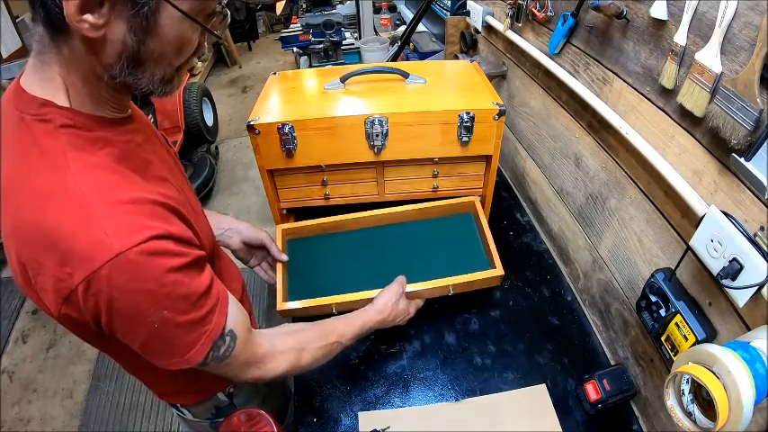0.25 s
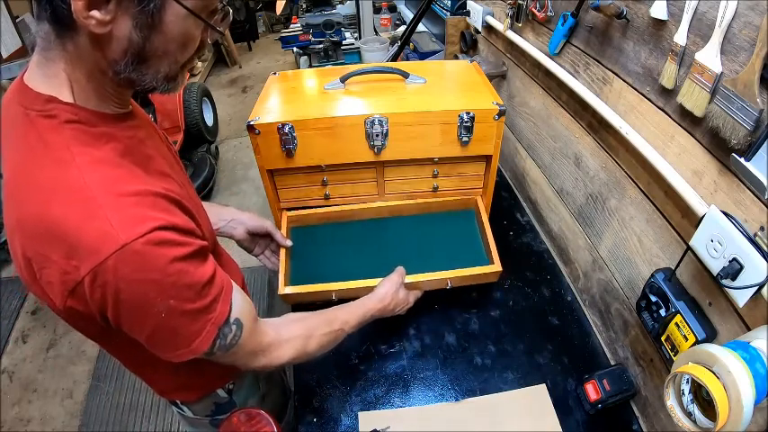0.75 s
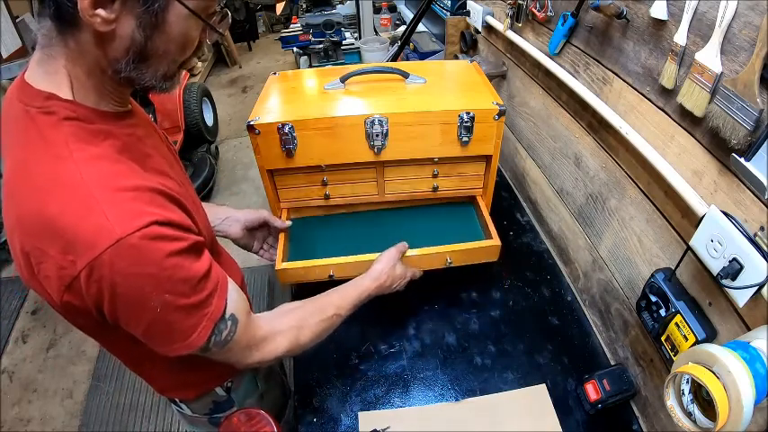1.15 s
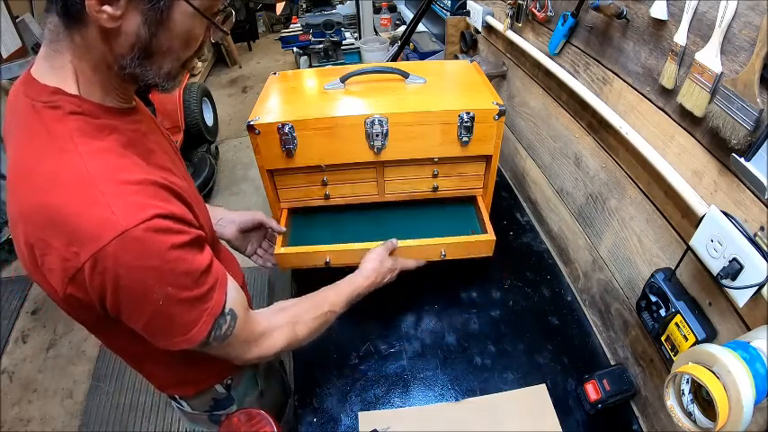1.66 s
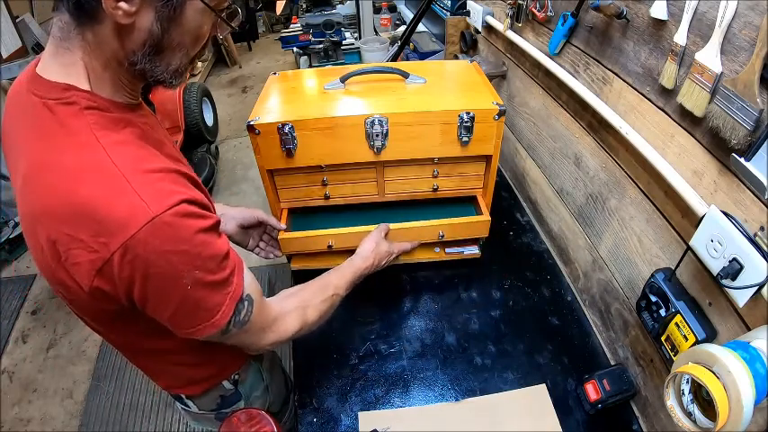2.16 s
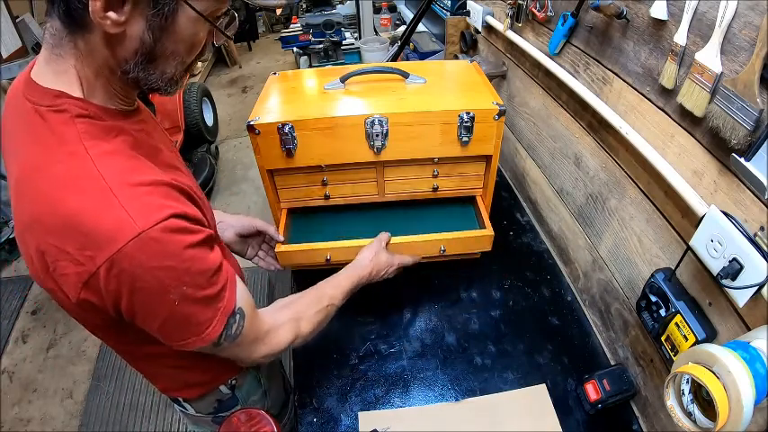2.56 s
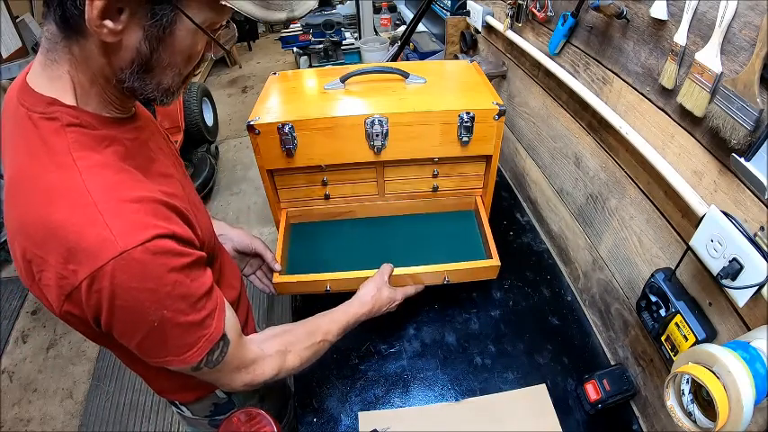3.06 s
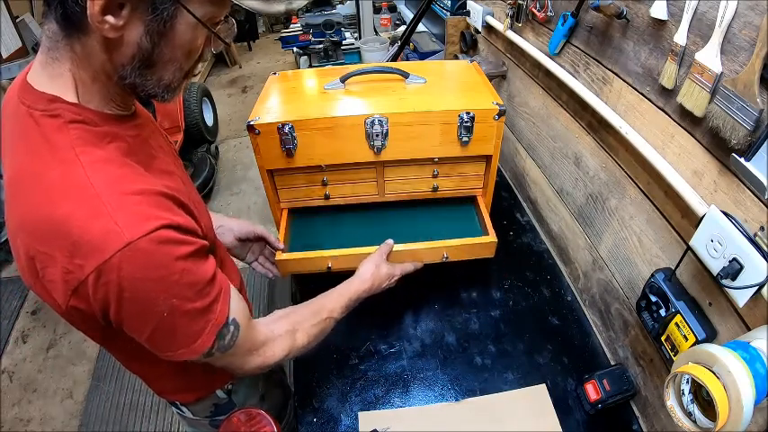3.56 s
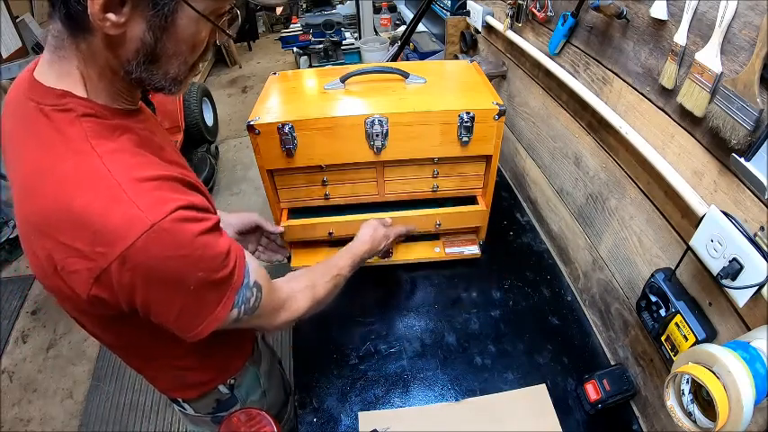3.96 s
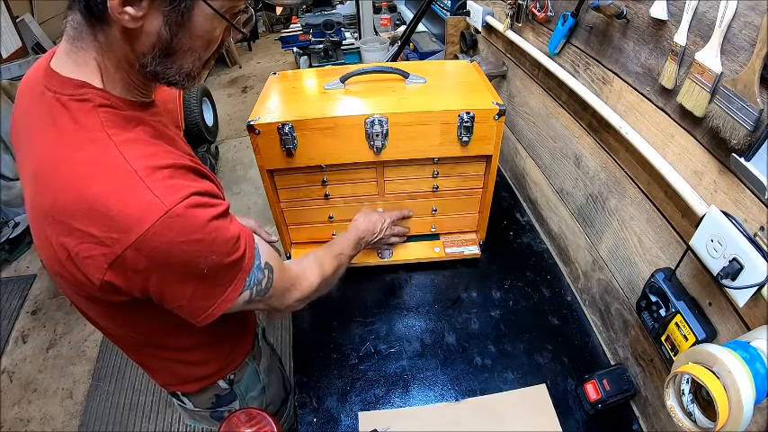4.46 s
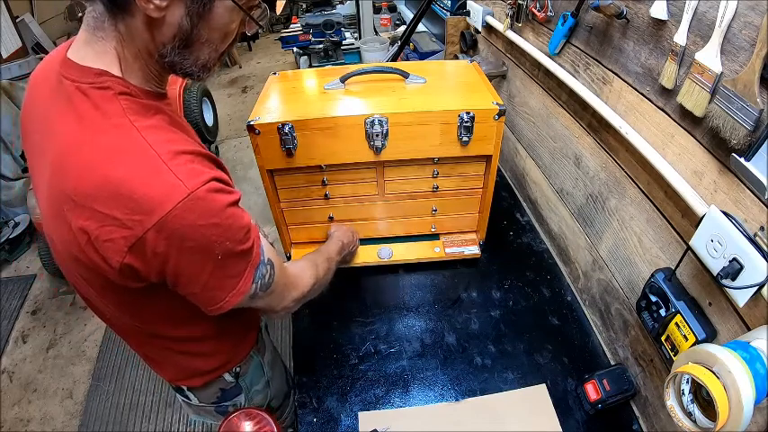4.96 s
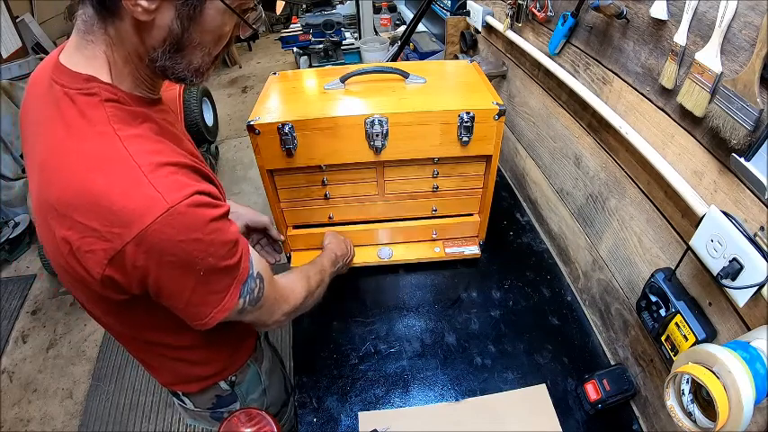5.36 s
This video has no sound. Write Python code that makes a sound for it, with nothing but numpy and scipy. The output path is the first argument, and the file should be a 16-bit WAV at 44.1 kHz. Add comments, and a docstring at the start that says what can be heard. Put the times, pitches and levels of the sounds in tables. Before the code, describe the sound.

Wood rubs on wood in short hissing strokes with dull knocks, a juddering squeak and a hard closing bump in a small workshop.

```python
"""A wooden drawer is fitted into a tool chest, slid in and out, and bumped shut; then the next one is pulled.
Each knock is a tick, a clack, a boom of the thin drawer bottom and a ring of the case, made of fading tones
and coloured noise. The sliding is noise that hisses, scrapes and drones with the speed of the hand;
where the drawer binds, a train of tiny slips makes it judder. A small workshop with a faint hum answers."""
import sys
import numpy as np
from scipy import signal
from scipy.fft import rfft, irfft
from scipy.io import wavfile

SR = 44100
rng = np.random.default_rng(int(sys.argv[2]) if len(sys.argv) > 2 else 0)


def output_pcm(signal):
    """Save a mono or channel-first signal as 16-bit PCM at the path in sys.argv[1].

    Samples are clipped to [-1, 1] before scaling.
    """
    pcm = np.clip(np.atleast_2d(signal).T, -1, 1) * 32767
    wavfile.write(sys.argv[1], SR, np.round(pcm).astype(np.int16))


N = 246675
TIME = np.arange(N) / SR  # seconds


def gain_of(db):
    """Turns decibels into amplitude."""
    return 10 ** (np.asarray(db) / 20)


def evened(x):
    """Scales a signal to an rms of 1."""
    return x / np.sqrt(np.mean(x ** 2) + 1e-20)


def read(points, hz):
    """Reads values between the points of a table, over log frequency."""
    f, value = np.transpose(points)
    return np.interp(np.log(hz + 1), np.log(f + 1), value)


def add(mix, s, sound):
    """Adds a sound into the mix from second s on, cut off at the end of the mix."""
    part = mix[..., round(s * SR):][..., :sound.shape[-1]]
    part += sound[..., :part.shape[-1]]


def wander(corner_hz, size=N):
    """Smooth random motion of rms 1; its parts faster than the corner are weak."""
    hz = np.fft.rfftfreq(size, 1 / SR)
    spectrum = rfft(rng.standard_normal(size))
    return evened(irfft(spectrum / (1 + (hz / corner_hz) ** 4), size))


def swell(t, rise):
    """Envelope that reaches 1 after the rise time and dies away."""
    return t / rise * np.exp(1 - t / rise)


def colour(pair, spectrum, peaks=()):
    """Shapes two unrelated signals into one stereo sound of rms 1, partly alike on both sides."""
    # How alike left and right are. Each row: frequency in Hz, likeness (1 is identical).
    likeness = [(30, .1), (70, 0.63), (130, 0.91), (250, 1), (600, 0.68), (1400, 0.29), (3100, 0.83),
                (6500, 0.26), (14000, 0.05)]
    z, hz = rfft(pair), np.fft.rfftfreq(pair.shape[1], 1 / SR)
    same = np.clip(read(likeness, hz), -1, 1)
    right = same * z[0] + np.sqrt(1 - same ** 2) * z[1]
    z = np.array([z[0], right])
    db = read(spectrum, hz)
    for f, width, lift in peaks:
        db = db + lift / (1 + (2 * (hz - f) / width) ** 2)
    return evened(irfft(z * gain_of(db), pair.shape[1]))


def workshop(hum_db=-2, waver=.5):
    """Still air as soft coloured noise, and a faint hum of steady tones whose phases waver (radians)."""
    # Spectrum of the air. Each row: frequency in Hz, relative level in dB per Hz.
    air_spectrum = [(15, -44), (25, 2), (93, -7), (196, 0.5), (515, -13), (709, -6.5), (978, -8.5),
                    (1150, -12), (2070, -20), (3440, -19), (6540, -25), (9020, -27), (15000, -41)]
    # Tones of the hum. Each row: frequency in Hz, level in dB before hum_db is added.
    hum_tones = [(183.0, -87), (721.4, -83.5), (958.2, -87), (1518, -95), (8950, -103)]
    air = gain_of(-73) * colour(rng.standard_normal((2, N)), air_spectrum)
    hum = np.zeros(N)
    for f, db in hum_tones:
        tone = np.sqrt(2) * np.sin(2 * np.pi * f * TIME + waver * wander(4))
        hum += gain_of(db + hum_db) * tone
    return air + hum


def room(x, wet_db=-7, first=.006, bass_db=-3):
    """Bench and walls: sparse reflections from `first` seconds on, each band dying at its own speed."""
    # How long the room rings. Each row: frequency in Hz, time to fall by 60 dB in seconds.
    ring_times = [(100, 0.37), (220, 0.29), (500, 0.24), (1500, 0.28), (4000, 0.26), (12000, 0.2)]
    kept = (rng.random((2, SR)) < .1) * (TIME[:SR] > first)
    taps = rng.standard_normal((2, SR)) * kept
    taps = colour(taps, [(200, bass_db), (800, 0.67), (3000, 0.92), (10000, 0.11)])
    hz, t, z = signal.stft(taps, SR, nperseg=256)
    fade = gain_of(-60 * t / read(ring_times, hz)[:, None])
    tail = signal.istft(z * fade, SR, nperseg=256)[1]
    tail = tail / np.linalg.norm(tail[0])
    return x + gain_of(wet_db) * signal.fftconvolve(x, tail, axes=1)[:, :N]


def fingers(level_db=3, rise=0.024):
    """Fingers feel along the varnished front for the next knob: one short rub of skin for each touch."""
    # Touches. Each row: start in seconds, level in dB before level_db is added.
    touches = [(4.847, -49.5), (4.972, -58), (5.131, -60.5), (5.283, -58)]
    # Sound of the skin. Each row: frequency in Hz, relative level in dB per Hz.
    skin_spectrum = [(100, -19), (210, 17.5), (330, 10.5), (500, -8), (750, 1), (1200, -6), (1500, -20.5),
                     (4000, -34)]
    touch = np.zeros(N)
    for s, db in touches:
        add(touch, s, gain_of(db + level_db) * swell(TIME[:SR // 3], rise))
    return touch * colour(rng.standard_normal((2, N)), skin_spectrum)


def singing(level_db=-2):
    """Friction feeds one resonance of a panel, which swells, glides and fades."""
    # Each row: start in seconds, length in seconds, first pitch in Hz, last pitch in Hz,
    # level in dB before level_db is added.
    glides = [(1.68, 0.24, 1533, 1460, -48.5), (2.279, 0.06, 1105, 1117, -53.5),
              (2.575, .07, 4190, 4000, -52), (2.618, 0.14, 781, 929, -43.5), (2.678, .15, 350, 324, -49.5),
              (2.52, 0.54, 1498, 1518, -56), (2.693, 0.195, 2727, 2640, -53),
              (3.501, 0.17, 2380, 2640, -50), (3.596, 0.073, 2115, 2080, -39)]
    out = np.zeros(N)
    for s, length, first_hz, last_hz, db in glides:
        u = np.minimum(TIME[:SR] / length, 1)  # progress from 0 to 1
        spread_hz = 12 + .033 * first_hz  # how far the unsteady tone blurs around its pitch
        turn = np.exp(2j * np.pi * np.cumsum(first_hz + (last_hz - first_hz) * u) / SR)
        unsteady = wander(spread_hz, size=SR) + 1j * wander(spread_hz, size=SR)
        tone = evened((turn * unsteady).real)
        add(out, s, gain_of(db + level_db) * np.sin(np.pi * u) * tone)
    return out


def squawks(rows, rough):
    """A board, let go or jolted, sings for a few cycles; `rough` is how far its pitch strays (share)."""
    t, out = np.arange(SR // 5) / SR, np.zeros(N)
    for s, db, hz, rise in rows:
        turns = np.cumsum(hz * (1 + rough * wander(400, size=len(t)))) / SR
        add(out, s, gain_of(db) * swell(t, rise) ** 2 * np.sin(2 * np.pi * turns))
    return out


def clicks(rise=.0018):
    """A hard edge meets a runner or the back stop with a short bright crack of noise."""
    # Each row: start in seconds, level in dB.
    cracks = [(0.458, -64), (0.873, -56.5), (1.612, -54), (4.43, -29)]
    # Sound of the edge. Each row: frequency in Hz, relative level in dB per Hz.
    edge_spectrum = [(300, -3), (1000, 7), (2700, 10.5), (4000, -1), (7700, -1), (10000, -6.5),
                     (15000, -30.5)]
    t, out = np.arange(SR // 10) / SR, np.zeros((2, N))
    for s, db in cracks:
        crack = colour(rng.standard_normal((2, len(t))), edge_spectrum)
        add(out, s, gain_of(db) * swell(t, rise) * crack)
    return out


def binds(grab_s=0.02, ease_db_per_s=9, let_go_s=0.019):
    """How hard the drawer sticks over time: each bind grabs quickly, eases a little and lets go."""
    # Each row: start in seconds, length until it lets go in seconds, strength in dB.
    sticking = [(0.559, 0.092, -57.5), (1.135, .07, -44.5), (1.236, 0.018, -49), (1.615, .04, -52),
                (1.793, 0.031, -49), (1.935, 0.022, -50.5), (2.488, 0.028, -47.5), (3.604, 0.14, -36.5),
                (3.653, 0.057, -36.5), (3.749, 0.053, -39), (3.839, 0.029, -41), (3.997, .05, -40),
                (4.172, 0.058, -48), (4.306, 0.019, -48), (5.528, .02, -50)]
    t, power = np.arange(SR // 2) / SR, np.zeros(N)
    for s, length, db in sticking:
        shape = np.minimum(t / grab_s, 1) * np.exp(-np.maximum(t - length, 0) / let_go_s)
        add(power, s, (shape * gain_of(db - ease_db_per_s * t)) ** 2)
    return np.sqrt(power)


def judder(level_db=1, slips_per_s=350, jitter=.22, size_db=4, soft_hz=4500):
    """Stick and slip: an uneven train of tiny releases rings the drawer's sides."""
    # Resonances of the sides. Each row: frequency in Hz, width in Hz, relative level in dB.
    side_modes = [(1015, 70, 0), (1069, 70, 3.5), (1366, 70, -4.5), (1702, 30, 1), (1583, 110, -8.5),
                  (2115, 100, -4), (2350, 40, -13), (2650, 100, -15), (2950, 130, -15)]
    turns = np.cumsum(slips_per_s * np.exp(jitter * wander(204.1))) / SR
    slips = np.diff(np.floor(turns), prepend=0)  # one pulse at each whole turn
    slips = slips * gain_of(size_db * wander(99))
    slips = signal.lfilter(*signal.butter(2, soft_hz, fs=SR), slips)  # wood yields, so no release is sudden
    t = np.arange(SR // 10) / SR
    ring = np.zeros(len(t))
    for f, width, db in side_modes:
        ring += gain_of(db) * width * np.exp(-np.pi * width * t) * np.cos(2 * np.pi * f * t)
    return gain_of(level_db) * evened(signal.oaconvolve(slips, ring)[:N]) * binds()


def speed(start, rise, steady, fall, start_curve=0.94, stop_curve=2.65):
    """One stroke, 0-1: the hand starts briskly, keeps its pace and eases out to rest."""
    up = np.clip((TIME - start) / rise, 0, 1)
    down = np.clip((TIME - start - rise - steady) / fall, 0, 1)
    return np.sin(np.pi / 2 * up) ** start_curve * np.sin(np.pi / 2 * (1 - down)) ** stop_curve


def strokes():
    """Strength of hiss, scrape and drone over time: all follow the speed of the stroke under way."""
    # Strokes of the hand. Each row: start, speeding up, steady and slowing down, all in seconds,
    # then hiss, scrape and drone of the drawer bottom, in dB before the trims in sliding().
    hand_moves = [(0.33, 0.044, .005, 0.034, -80, -69, -64), (0.531, 0.096, 0.011, .07, -83, -53.5, -55.5),
                  (0.66, 0.06, 0.039, 0.19, -82, -67, -60), (0.86, 0.019, 0.11, 0.16, -73, -68, -50),
                  (0.968, .21, 0.016, 0.19, -56.5, -48.5, -50.5),
                  (1.587, 0.21, 0.025, 0.33, -50.5, -45.5, -51.5),
                  (2.04, 0.093, 0.014, 0.086, -63.5, -60.5, -59),
                  (2.268, 0.075, .005, 0.072, -66, -59.5, -55), (2.439, 0.17, 0.052, 0.49, -51, -45.5, -54),
                  (3.371, 0.37, .17, 0.29, -51.5, -47, -52), (3.92, 0.15, 0.32, 0.067, -57, -51.5, -53.5),
                  (4.85, 0.029, 0.033, 0.32, -66.5, -67.5, -66.5), (5.287, .24, .1, .2, -54, -47, -56)]
    drive = np.zeros((3, N))
    for start, rise, steady, fall, *levels_db in hand_moves:
        stroke = np.outer(gain_of(levels_db), speed(start, rise, steady, fall))
        drive = np.maximum(drive, stroke)
    return drive


def overhang(x, depth_db, width_hz, hold):
    """Lets bands rise and sink at random, like the boards' resonances as the drawer's free length changes."""
    hz, t, z = signal.stft(x, SR, nperseg=1024)

    def blur(axis, reach):
        """Weights that smooth along one axis."""
        return np.exp(-((axis[:, None] - axis) / reach) ** 2)

    field = evened(blur(hz, width_hz) @ rng.standard_normal(z.shape[1:]) @ blur(t, hold))
    bass_guard = np.minimum(hz / 1000, 1)[:, None]  # less change below 1000 Hz
    return evened(signal.istft(z * gain_of(depth_db * field * bass_guard), SR, nperseg=1024)[1][:, :N])


def sliding(hiss_db=1, scrape_db=1, drone_db=1, grain_db=1.27, uneven_db=1.64, catch_db=1.26, bind_db=-42):
    """Countless fibres catch and let go: speed makes hiss and drone, pressure drives the drawer's resonances."""
    # Wood rubbing on wood. Each row of these three: frequency in Hz, relative level in dB per Hz.
    hiss_spectrum = [(1500, -14.5), (3200, -3), (4100, 2), (5400, -4.5), (6300, -4), (7800, -2.5),
                     (8500, -12), (9100, -8.5), (10000, -16.5), (10800, -16.5), (11600, -27.5),
                     (13400, -26.5), (15000, -39.5)]
    scrape_spectrum = [(110, -31.5), (270, -7.5), (340, -7.5), (540, -6), (900, -0.5), (1220, -5.5),
                       (1550, 0), (1850, -8), (2700, -3.5), (3400, -12), (6000, -51)]
    drone_spectrum = [(40, -30.5), (115, -21), (150, 5.5), (205, 8), (270, -1.5), (400, -16.5), (1000, -54)]
    # Resonances of the sliding drawer. Each row: frequency in Hz, width in Hz, lift in dB.
    drawer_peaks = [(328.8, 93, 12), (968, 250, 1.5), (1680, 29, -1), (2135, 160, 3.5), (2370, 71, 1)]
    grip = evened(gain_of(grain_db * wander(580) + uneven_db * wander(26)))
    hiss = colour(grip * rng.standard_normal((2, N)), hiss_spectrum)
    scrape = colour(grip * rng.standard_normal((2, N)), scrape_spectrum, drawer_peaks)
    drone = colour(grip * rng.standard_normal((2, N)), drone_spectrum)
    hiss = overhang(hiss, depth_db=2.7, width_hz=60, hold=.15)
    scrape = overhang(scrape, depth_db=2.8, width_hz=45, hold=.1)
    pace, weight, flex = strokes()
    pressure = np.hypot(weight, gain_of(-3) * binds())  # a bind's extra pressure also drives the scrape
    binding = np.minimum(pressure / gain_of(bind_db), 1)  # pressed hard, the wood catches in coarse jerks
    jerks = gain_of(catch_db * binding * wander(140))
    out = gain_of(hiss_db) * pace * hiss
    out += gain_of(scrape_db) * pressure * jerks * scrape
    return out + gain_of(drone_db) * flex * drone


def knocks(boom_db=0, case_db=-2.0, upper_db=-0.5, clack_db=-14, tick_db=-45, boom_rise=0.00724,
           case_rise=0.0047, clack_rise=0.0047, tick_rise=0.0017, place_db=1.5, soften=0.29):
    """Each knock: a tick at the contact, a clack of the boards, the boom of the bottom, the ring of the case."""
    # Knocks of drawer on case; the rows from 4.872 to 5.13 s are soft bumps of the fingers on the front. # Each
    # row: start in seconds, strength in dB, boom pitch in Hz, hardness in dB (0 is a usual blow, less is
    # duller).
    blows = [(0.189, -17.5, 213, 0.5), (0.498, -23, 183, -0.5), (0.53, -31, 145, -3),
             (0.725, -39.5, 173, 0), (0.872, -35, 190, 4), (0.884, -32, 170, 2.5), (1.335, -31, 201, -5.5),
             (1.367, -23, 190, -8), (1.437, -31.5, 188, -15.5), (1.612, -33, 236, -1), (1.63, -32, 198, -9),
             (1.735, -37, 180, 8), (1.97, -27.5, 282, 3), (2.003, -28.5, 186, 3), (2.114, -45, 218, -14),
             (2.283, -39, 172, -6), (2.351, -46, 218, 2), (3.755, -23.5, 201, 3), (4.001, -29, 140, 7),
             (4.014, -21.5, 145, 5), (4.044, -21.5, 141, 4.5), (4.089, -14.5, 211, 1.5),
             (4.248, -25, 160, 0), (4.276, -30.5, 147, 4), (4.412, -11.5, 218, 0.5),
             (4.43, -9.5, 195.5, -4), (4.477, -24.5, 176.5, -10.5), (4.872, -33.5, 211, -11),
             (4.983, -44.5, 211, -7), (5.03, -37, 209, -12), (5.13, -48, 213, -2), (5.346, -25.5, 166, -15)]
    # Tones of the case. Each row: frequency in Hz, relative level in dB, time to fall by 60 dB in seconds.
    case_modes = [(84, -26, 0.27), (125, -13, 0.15), (138.3, -11.5, 0.21), (170, -25, .14),
                  (197, -24.5, 0.1), (242, -10, 0.17), (337.4, -23.5, 0.3), (384.8, -26, 0.26),
                  (429.5, -21.5, 0.19), (470, -24.5, 0.26), (532.7, -25, 0.12), (604.7, -24.5, .18),
                  (796, -24, 0.12), (1060, -27, 0.09), (1705, -37.5, 0.14), (1886, -40, 0.19),
                  (2643, -44.5, .16)]
    # Crowded upper modes of the boards, then the hard contact itself.
    # Each row: frequency in Hz, relative level in dB per Hz.
    clack_spectrum = [(70, -11.5), (130, -5.5), (210, -7.5), (330, 8.5), (500, 2.5), (750, 0), (1070, -5),
                      (1400, -9.5), (2700, -20.5), (4000, -25), (9000, -51)]
    tick_spectrum = [(1000, -30), (3000, -7), (5000, 11.5), (7700, 14.5), (10000, -2), (15000, -14.5)]
    t, out = np.arange(SR // 3) / SR, np.zeros((2, N))
    mode_hz, mode_db, t60 = np.transpose(case_modes)[:, :, None]
    upper = np.clip(np.log2(mode_hz / 240), 0, 1)  # 0 for low modes, 1 for those that need a hard blow
    for s, blow_db, hz, hard_db in blows:
        boards_db = blow_db + hard_db
        contact = gain_of(-soften * hard_db)  # a duller blow has a longer contact
        grain = rng.standard_normal((2, 2, len(t)))
        share, turn = 2 * rng.random((2, len(case_modes), 1)) - 1  # set by where the blow lands
        drive_db = (1 - upper) * (blow_db + case_db) + upper * (boards_db + upper_db) + place_db * share
        phase = 2 * np.pi * (mode_hz * (t - boom_rise) + upper * turn)  # the low modes swing with the bottom
        ring = (gain_of(mode_db + drive_db - 60 * t / t60) * np.sin(phase)).sum(0)
        ring *= 1 - np.exp(-(t / (case_rise * contact)) ** 2)  # soft onset
        boom = swell(t, boom_rise) ** 2 * np.sin(2 * np.pi * hz * (t - boom_rise))
        clack = swell(t, clack_rise * contact) * colour(grain[0], clack_spectrum)
        tick = swell(t, tick_rise) * colour(grain[1], tick_spectrum)
        add(out, s, gain_of(blow_db + boom_db) * boom + ring)
        add(out, s, gain_of(boards_db + clack_db) * clack)
        add(out, s, gain_of(boards_db + tick_db) * tick)
    return out


def scene():
    """The chest on its bench in the workshop, heard a little from the right."""
    # Single hard slips that squawk, then neighbouring drawers jolted by the hardest bumps; the last row is a
    # second swell of the first knock's boom. # Each row: start in seconds, level in dB, pitch in Hz, rise in
    # seconds.
    hard_slips = [(0.496, -37.5, 2120, 0.0013), (0.496, -43, 2760, 0.00071), (2.004, -34, 1125, 0.0022),
                  (3.615, -32.5, 1368, 0.012), (3.661, -20.5, 1056, 0.0037), (3.69, -30.5, 1000, 0.0085),
                  (3.850, -38, 1502, 0.014), (1.199, -37, 1032, 0.0052), (4.430, -23, 1080, 0.0018)]
    jolted_drawers = [(4.431, -22, 516, 0.0044), (4.452, -25.5, 440, 0.0092), (4.456, -39.5, 560, 0.0079),
                      (4.488, -38, 290, 0.01), (4.432, -16.5, 140, 0.012), (0.192, -20.5, 229.7, 0.008)]
    # Balance of the sides. Each row: frequency in Hz, left minus right in dB.
    side_lean = [(130, -.8), (600, -1), (1150, -3.8), (2200, -.7), (7000, 0)]
    blows = knocks() + clicks() + squawks(hard_slips, rough=0.062) + squawks(jolted_drawers, rough=0.069)
    struck = room(blows, wet_db=-6.5, first=.012, bass_db=-5.5)
    rubs = sliding() + judder() + singing() + fingers()
    rubbed = room(rubs, wet_db=-10.5, first=0.0041, bass_db=4.5)
    lean_db = np.outer([.5, -.5], read(side_lean, np.fft.rfftfreq(N, 1 / SR)))
    return irfft(rfft(struck + rubbed) * gain_of(lean_db), N) + workshop()


def record(dry, edge_hz=15300):
    """Limits the band: a steep filter takes away the treble above the edge."""
    lowpass = signal.firwin(511, edge_hz, window=("kaiser", 9), fs=SR)
    return signal.oaconvolve(dry, lowpass[None], "same")


dry = scene()
out = record(dry)
output_pcm(out)
```